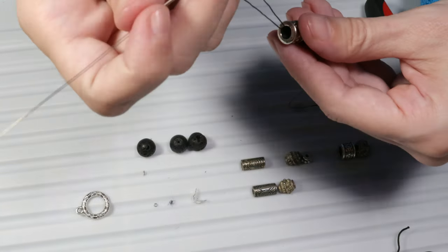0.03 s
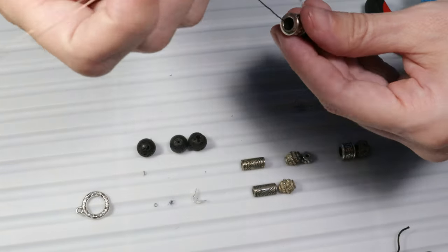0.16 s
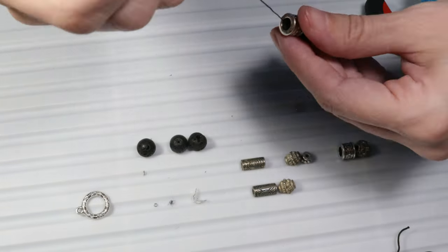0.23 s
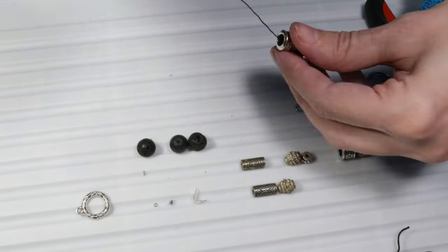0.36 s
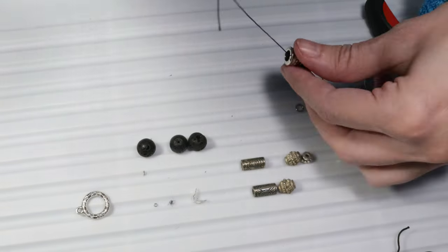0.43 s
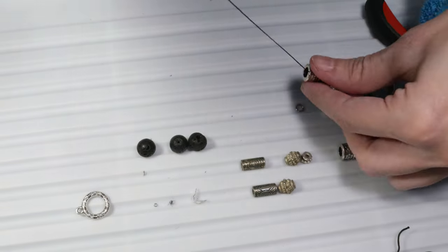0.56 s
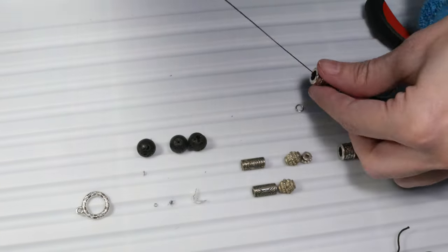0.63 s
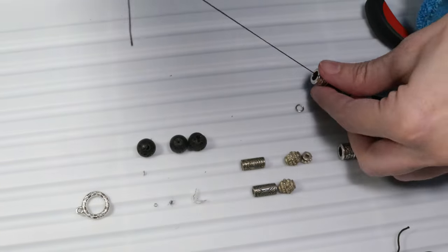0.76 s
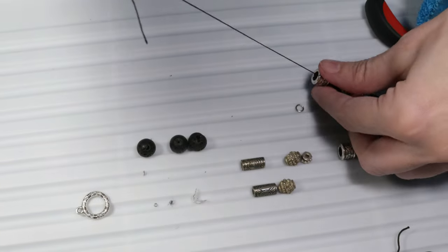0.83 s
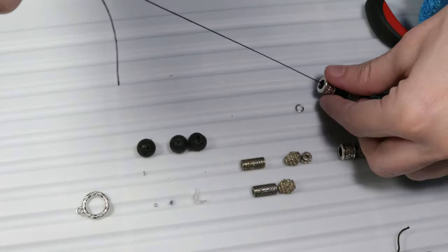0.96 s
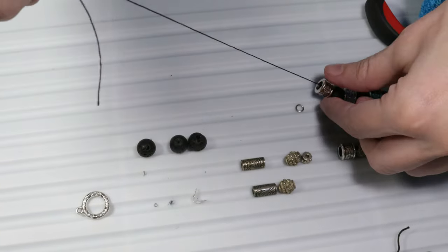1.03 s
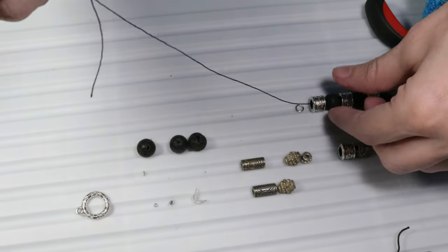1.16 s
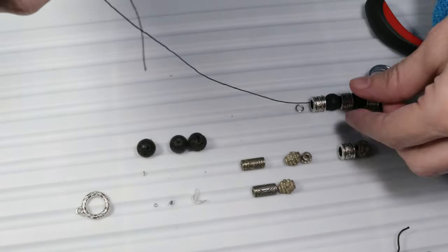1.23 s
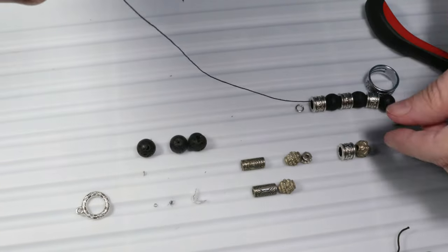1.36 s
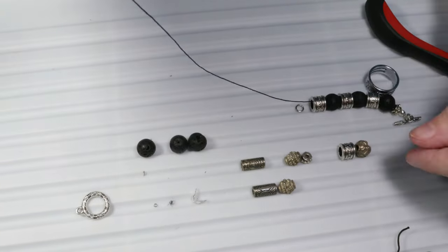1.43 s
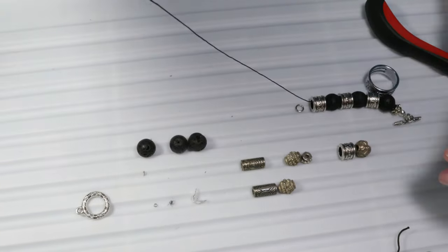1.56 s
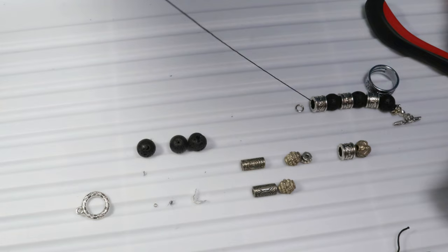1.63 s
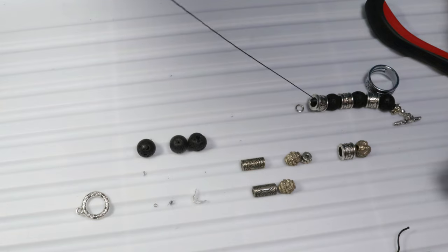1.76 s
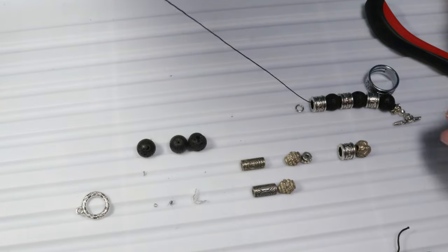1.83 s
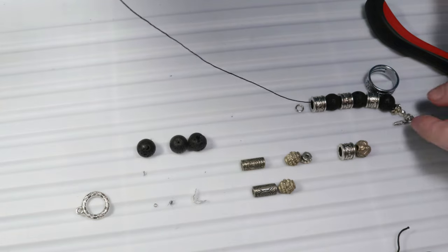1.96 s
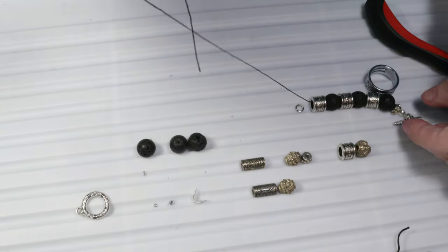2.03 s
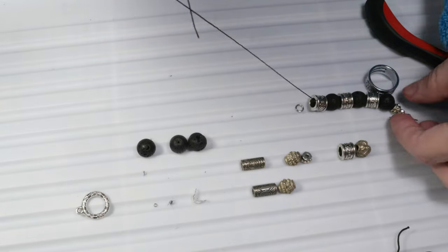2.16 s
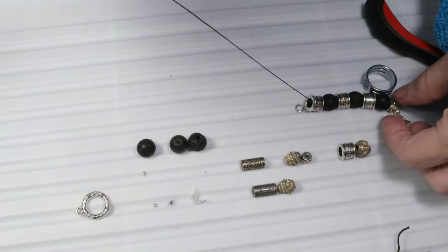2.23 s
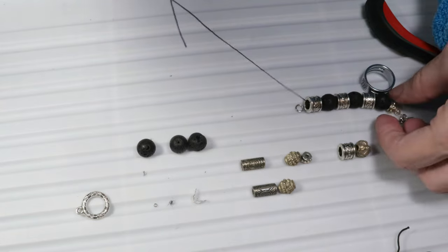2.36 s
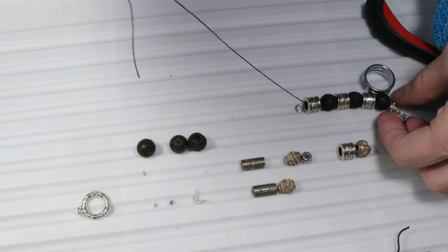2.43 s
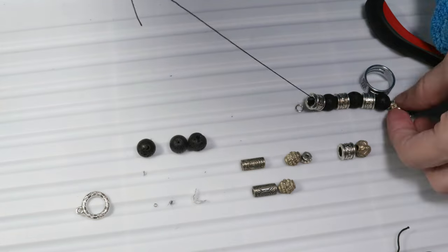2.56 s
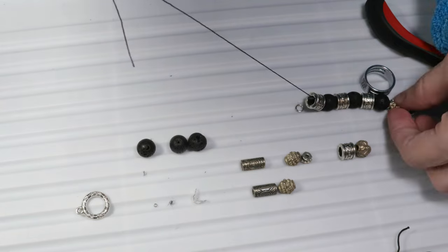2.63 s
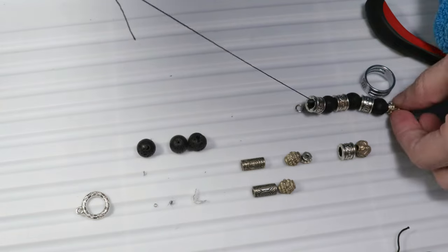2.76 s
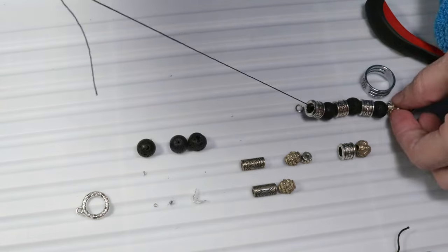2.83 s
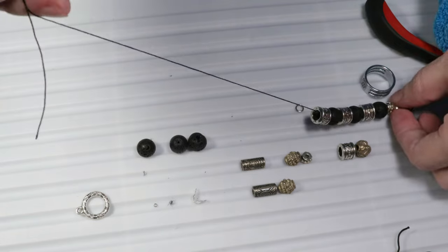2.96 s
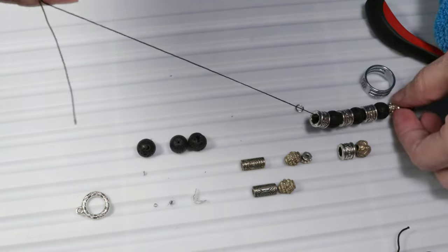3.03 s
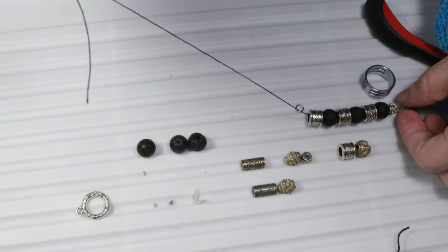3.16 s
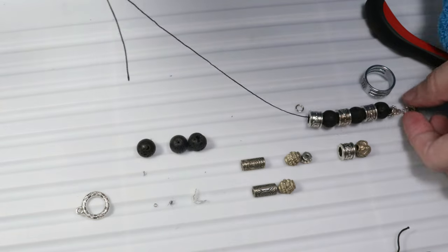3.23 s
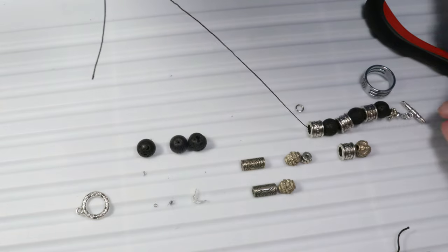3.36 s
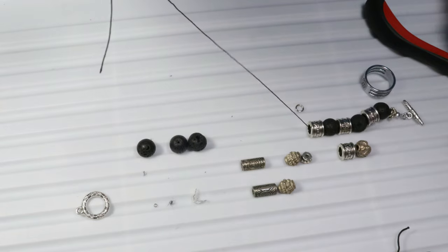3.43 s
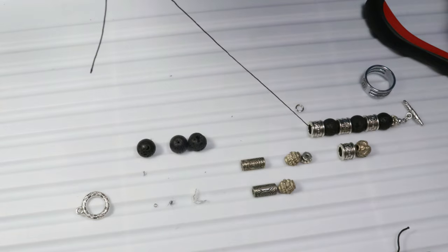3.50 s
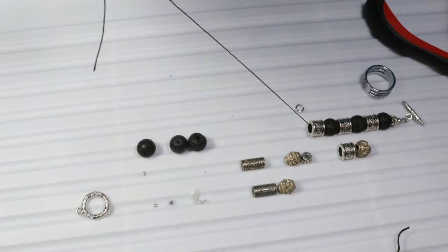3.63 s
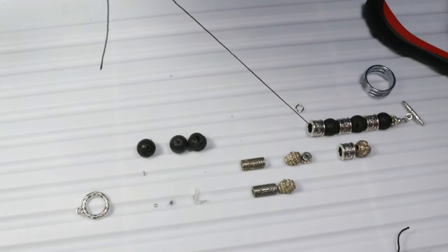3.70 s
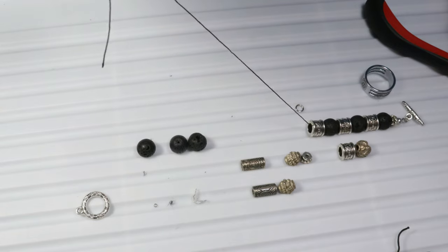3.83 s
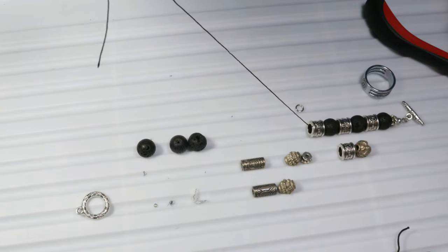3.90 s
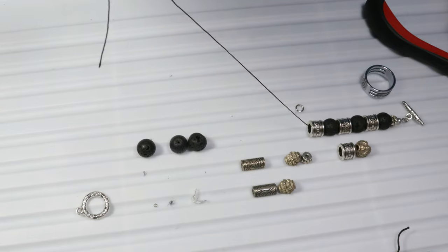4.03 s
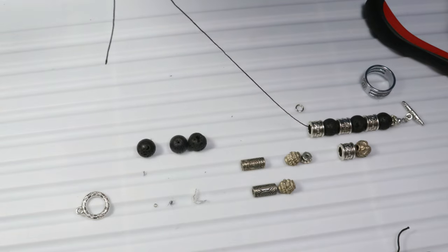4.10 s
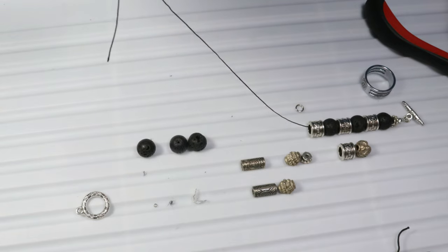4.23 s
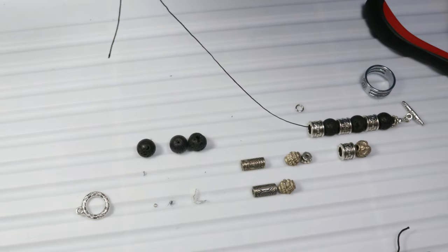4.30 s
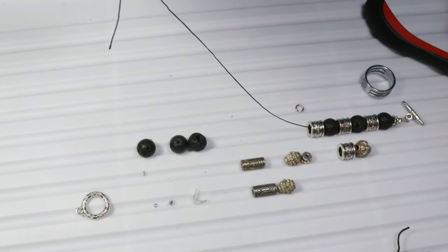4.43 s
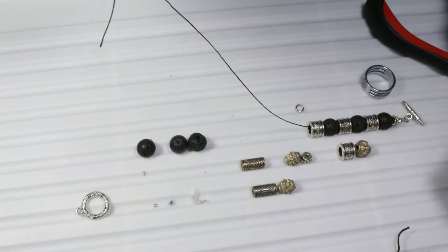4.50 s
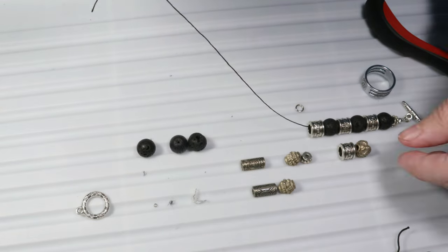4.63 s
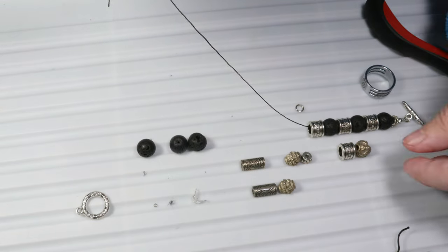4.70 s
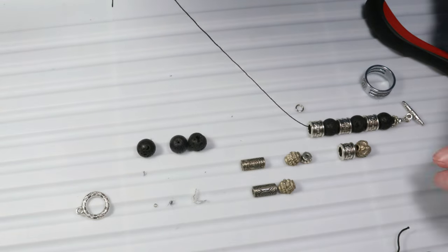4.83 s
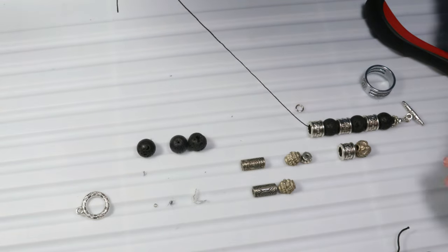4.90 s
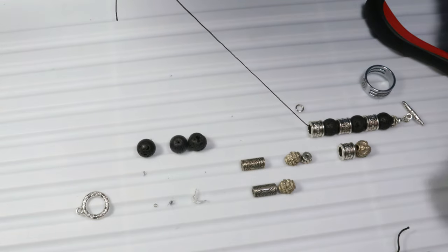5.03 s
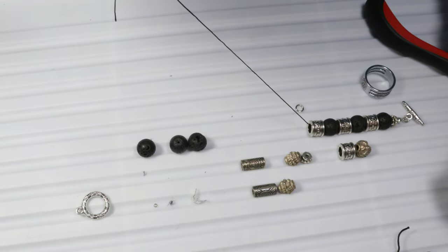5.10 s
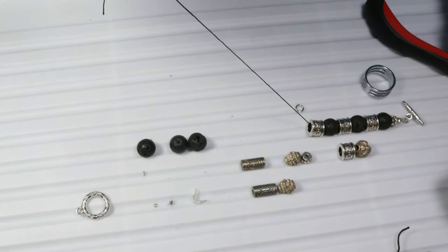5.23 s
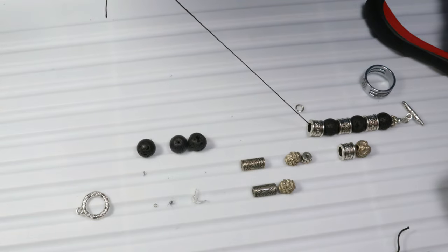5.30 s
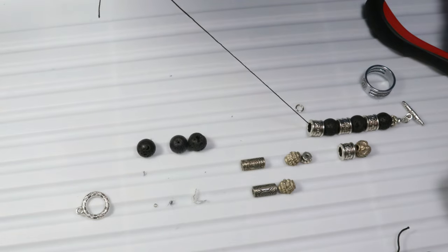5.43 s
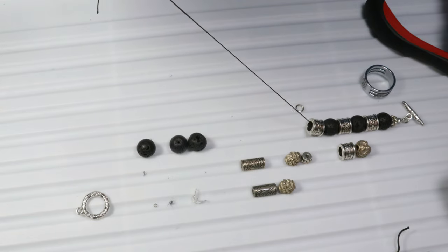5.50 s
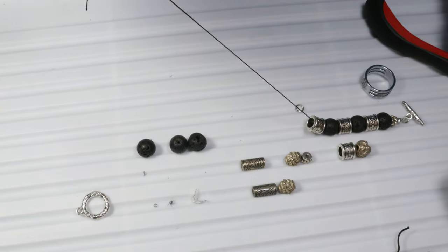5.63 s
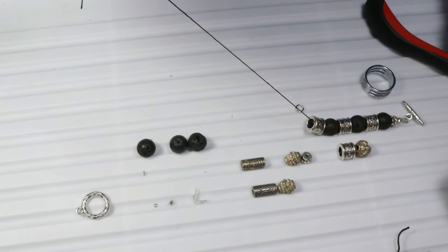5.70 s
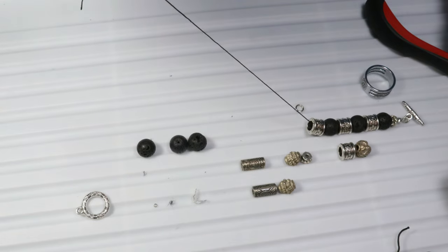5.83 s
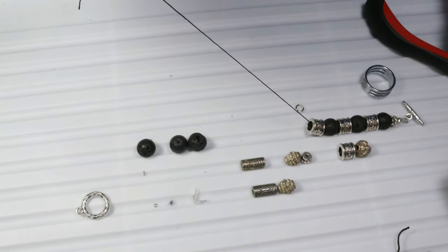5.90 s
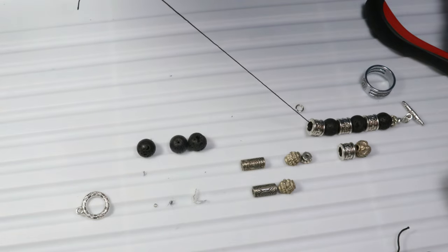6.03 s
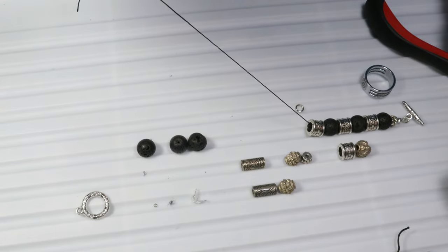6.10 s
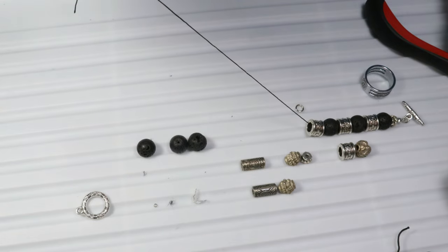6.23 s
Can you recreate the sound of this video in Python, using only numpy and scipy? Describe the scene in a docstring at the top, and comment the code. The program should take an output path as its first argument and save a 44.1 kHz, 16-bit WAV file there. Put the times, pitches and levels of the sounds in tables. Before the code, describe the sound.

Beads tap, rattle and drag across a hard, ridged tabletop tray, heard close up in a small room with very short reflections. Dry mid-pitched clacks come in uneven bursts, joined by soft fingertip thumps, faint stuttering scrapes and a barely audible thin metallic ping. The busy handling stops after under four seconds, leaving sparse faint clicks in a steady low hiss with slight hum.

```python
"""Small room, table, ribbed plastic tray: a strand of metal and stone beads is threaded, dragged, dropped.
Knocks ring short modes of tray, table and beads; drags are dense patters of small blows into the same modes.
Soft finger thumps ring only the low modes; a tube bead pings thin and high.
Decaying noise tails make the room; steady coloured noise makes the hush, narrow noise bands its faint hum.
A two-port microphone sets the stereo image from slopes of the direct sound."""
import sys
import numpy as np
from scipy import signal
from scipy.fft import rfft, irfft
from scipy.io import wavfile
from scipy.ndimage import uniform_filter1d

SR = 44100
rng = np.random.default_rng(int(sys.argv[2]) if len(sys.argv) > 2 else 0)


def dump(signal):
    """Clip the signal to [-1, 1] and save it as 16-bit WAV at the path in sys.argv[1]."""
    limited = np.clip(np.atleast_2d(signal).T, -1, 1)
    pcm = np.round(limited * 32767).astype(np.int16)
    wavfile.write(sys.argv[1], SR, pcm)


N = 276088
RING_N = 4096  # samples per blow


def undb(db):
    """dB to gain."""
    return 10 ** (np.asarray(db) / 20)


def level(x, db):
    """Set the rms."""
    return x * undb(db) / np.sqrt(np.mean(x ** 2))


def coloured(points):
    """White noise shaped in frequency, interpolated in dB over log frequency."""
    hz, db = np.transpose(points)
    f = np.fft.rfftfreq(N, 1 / SR)
    gain = undb(np.interp(np.log(f + 1), np.log(hz), db))
    return irfft(rfft(rng.standard_normal(N)) * gain, N)


# background spectra, mid and side: (frequency [Hz], relative density [dB])
HUSH_MID_SPECTRUM = [(15, -42), (25, -9.5), (198, -6.5), (221, -6.5), (410, -7), (445, -1.5), (509, -13),
                     (598, -11.5), (970, -15), (1140, -15), (1570, -23), (2060, -22.5), (9810, -42),
                     (13200, -47.5), (15500, -71)]
HUSH_SIDE_SPECTRUM = [(15, -54), (25, -24), (160, -8.5), (227, -5.5), (260, -7), (349, -6), (421, -6.5),
                      (1200, -10.5), (4750, -21.5), (10900, -33), (15500, -36)]
# wavering hum: (centre [Hz], width [Hz], rms level [dB])
HUM_BANDS = [(232.9, 6.2, -59.5), (460, 51, -58)]
HUSH_MID_RMS_DB, HUSH_SIDE_RMS_DB = -49, -50


def hush():
    """Steady coloured noise, mid and side; narrow noise bands waver as hum in the middle."""
    mid = level(coloured(HUSH_MID_SPECTRUM), HUSH_MID_RMS_DB)
    for hz, width_hz, db in HUM_BANDS:
        edges_hz = [hz - width_hz / 2, hz + width_hz / 2]
        band = signal.butter(1, edges_hz, "bandpass", fs=SR, output="sos")
        mid = mid + level(signal.sosfilt(band, rng.standard_normal(N)), db)
    side = level(coloured(HUSH_SIDE_SPECTRUM), HUSH_SIDE_RMS_DB)
    return np.array([mid, side])


# room tail: (band centre [Hz], t60 [s], mid gain [dB], side gain [dB])
ROOM_BANDS = [(242, 0.2, -2, -24), (498, 0.11, -9.5, -44), (1250, 0.14, -6.5, -34),
              (1900, 0.25, -18.5, -36), (3050, 0.16, -7, -18), (4800, 0.2, -10, -11), (9600, 0.084, -7, 0)]
FIRST_ECHO_S, ECHO_RISE_S = 0.004, 0.0007  # the walls answer after a gap


def room(x):
    """Echoes as decaying noise tails, band by band, mid and side; new tails on each call."""
    t = np.arange(SR // 3) / SR
    tails = np.zeros((2, len(t)))
    for hz, t60_s, mid_db, side_db in ROOM_BANDS:
        edges_hz = [hz / 1.4, min(hz * 1.4, 20000)]
        band = signal.butter(2, edges_hz, "bandpass", fs=SR, output="sos")
        noise = signal.sosfilt(band, rng.standard_normal((2, len(t))))
        onset = np.clip((t - FIRST_ECHO_S) / ECHO_RISE_S, 0, 1)
        shape = np.exp(-np.log(1000) * t / t60_s) * onset
        shape /= np.sqrt(np.sum(shape ** 2))
        tails += noise * shape * undb([[mid_db], [side_db]])
    return signal.fftconvolve(x[None], tails, axes=1)[:, :N]


# modes of table, tray and beads: (nominal frequency [Hz], level within its part [dB], t60 [s])
MODES = [(205.3, 7.5, 0.073), (226, 4.5, 0.11), (316, 9.5, 0.08), (403, -7, 0.021), (485, -19, 0.089),
         (626, 9.5, 0.034), (729, 0, 0.06), (911, 2.5, 0.013), (1071, 7.5, 0.021), (1269, -1, 0.07),
         (1820, -9.5, 0.0052), (1963, 11.5, 0.025), (2195, 2, 0.02), (2510, -0.5, 0.037), (3313, -6, 0.012),
         (3403, 4.5, 0.011), (4410, 4, 0.0081), (5100, 1, 0.0075), (6260, 11.5, 0.0018),
         (7340, 4.5, 0.0017), (9170, -8, 0.0098), (10300, 2, 0.0049), (11010, -5, 0.0055)]
# bounds of thud, body, knock, clack, edge, tick: frequency [Hz]
PART_BOUNDS_HZ = [0, 440, 850, 1500, 2950, 6700, 20000]


def part(k):
    """Modes between two bounds, sounding as one part."""
    return [mode for mode in MODES if PART_BOUNDS_HZ[k] < mode[0] <= PART_BOUNDS_HZ[k + 1]]


SCATTER_DB, DETUNE = 2.5, 0.012  # spread of mode level and of relative pitch from blow to blow
MIN_T60_S = 0.002


def ring(modes, chance, contact_s):
    """One blow on decaying sine modes, peak 1; chance shifts their strength and pitch."""
    t = np.arange(RING_N) / SR
    hz, db, t60_s = np.transpose(modes)[:, :, None]
    chance = chance[:len(modes)]
    gain = undb(db + SCATTER_DB * chance[:, :1])
    phase = 2 * np.pi * hz * (1 + DETUNE * chance[:, 1:]) * t
    decay = np.exp(-np.log(1000) * t / np.maximum(t60_s, MIN_T60_S))
    y = np.sum(gain * decay * np.sin(phase), axis=0)
    y *= 1 - np.exp(-(t / contact_s) ** 2)
    return y / np.abs(y).max()


# how long the push on each part lasts, thud to tick: duration [s]
PUSH_S = [0.0036, 0.0004, 0.00024, 0.00023, 0.00018, 0.00016]


def strike(k, modes, chance):
    """Ring modes of part k with its own contact time; a longer push softens the onset."""
    return ring(modes, chance, PUSH_S[k])


# fingers landing softly on the table: (time [s], thud level [dB])
FINGER_THUMPS = [(0.8016, -35), (1.0066, -35.5), (2.191, -32), (2.5563, -29.5), (3.6246, -35)]
THUMP_BODY_DB = -3  # re thud


def thumps():
    """A fingertip sounds only the two lowest parts."""
    out = np.zeros(N + RING_N)
    for s, thud_db in FINGER_THUMPS:
        i = int(s * SR)
        chance = rng.standard_normal((2, 8, 2))
        for k, rel_db in enumerate((0, THUMP_BODY_DB)):
            out[i:i + RING_N] += undb(thud_db + rel_db) * strike(k, part(k), chance[k])
    return out[:N]


# metal tube bead left free to ring: (time [s], peak level [dB])
TUBE_PINGS = [(.955, -60), (1.025, -52), (1.037, -52), (1.226, -55)]
TUBE_HZ, TUBE_T60_S, TUBE_CONTACT_S = 6560, 0.047, 0.0023


def tube():
    """A free tube rings one high mode: a thin ping."""
    out = np.zeros(N + RING_N)
    for s, db in TUBE_PINGS:
        i = int(s * SR)
        ping = ring([(TUBE_HZ, 0, TUBE_T60_S)], np.zeros((1, 2)), TUBE_CONTACT_S)
        out[i:i + RING_N] += undb(db) * ping
    return out[:N]


# strand and fingers over the tray; "fullest" outside the stroke leaves only a swell or a fade:
# (start [s], fullest [s], end [s], level [dB], weight [dB], brightness [dB])
STROKES = [(0.556, 0.776, 0.89, -52.5, -3, 18), (0.783, 0.78, 0.93, -49, -4, 4),
           (0.925, 1.083, 1.394, -47, -0.5, 9), (2.19, 2.26, 2.3, -45, -6, 8),
           (2.275, 2.312, 2.37, -40.5, -6.5, -3), (2.347, 2.368, 2.474, -49, 3.5, -6),
           (2.555, 2.562, 2.74, -38, -14, 19), (2.75, 2.762, 2.81, -58, 3, -1),
           (2.897, 3.04, 3.08, -52.5, -0.5, 3), (3.112, 3.1, 3.3, -62.5, 12.5, -16),
           (3.344, 3.386, 3.46, -50, -13, 3), (3.68, 3.798, 7.4, -58, -14, -6),
           (1.927, 1.97, 1.945, -56, 8, 5)]
# parts, thud to tick: (level re stroke [dB], share of weight [ratio], share of brightness [ratio])
STROKE_MIX = [(4, 0.61, 0.051), (7, 0.86, 0.15), (1, 1, 0.26), (2, 0.69, 0), (-12.5, 0.2, 0.019),
              (-47, 1.2, 0.46)]
STREAMS, GRAINS_PER_S = 8, 1100  # rate over all streams
GRAIN_DB, GRAIN_TOP = 6, 2.2  # spread; largest grain in spreads
STROKE_FADE_DB, SWELL_SMOOTH_SAMPLES = -14.5, 300  # fade at either end of a stroke
DRAG_WANDER = 0.05  # relative pitch spread: the strand crosses many spots
DRAG_DAMPING = 0.93  # fingers shorten every ring (t60 ratio)


def grain_stream():
    """Sparse random impulses of random size and sign."""
    hits = rng.random(N) < GRAINS_PER_S / SR / STREAMS
    size = undb(GRAIN_DB * np.minimum(rng.standard_normal(N), GRAIN_TOP))
    return hits * size * rng.choice([-1, 1], N)


def stroke_swell(start_s, full_s, end_s, db):
    """Gain over one stroke, moving in dB."""
    t = np.arange(N) / SR
    times_s = [start_s, full_s, end_s]
    shape_db = np.interp(t, times_s, [STROKE_FADE_DB, 0, STROKE_FADE_DB])
    return ((t > start_s) & (t < end_s)) * undb(db + shape_db)


def drag():
    """Beads and fingers stutter over the ribs: a dense patter of small blows, gated by the strokes."""
    streams = [grain_stream() for _ in range(STREAMS)]
    swells = [stroke_swell(*stroke[:4]) for stroke in STROKES]
    out = np.zeros(N)
    for k, (db, heavy, hard) in enumerate(STROKE_MIX):
        modes = np.array(part(k)) * [1, 1, DRAG_DAMPING]
        patter = np.zeros(N)
        for grains in streams:
            pitch = 1 + DRAG_WANDER * rng.standard_normal()
            blow = strike(k, modes * [pitch, 1, 1], rng.standard_normal((8, 2)))
            patter += signal.fftconvolve(grains, blow)[:N]
        gain = np.zeros(N)
        for swell, stroke in zip(swells, STROKES):
            gain += swell * undb(heavy * stroke[4] + hard * stroke[5])
        out += uniform_filter1d(gain, size=SWELL_SMOOTH_SAMPLES) * level(patter, db)
    return out


# beads striking the tray, levels before settling: (time [s], clack [dB], body [dB], knock [dB],
# edge [dB], tick [dB], clack pitch [Hz])
BEAD_KNOCKS = [(0.5736, -20, -29, -23.5, -33, -33, 2040), (0.6041, -33, -36, -51, -60, -52, 1970),
               (0.6621, -37.5, -41, -51, -59, -67.0, 2050), (0.7153, -34, -54, -54, -62, -56.0, 2040),
               (0.7617, -35, -42, -48, -50.5, -64.0, 1970), (0.7865, -25, -55, -32, -37, -25, 2030),
               (0.7944, -29.5, -27, -30, -31.5, -30, 2140), (0.8011, -32, -41, -48, -41, -27.5, 2140),
               (0.8036, -38, -37, -39, -42, -39, 2000), (0.815, -40, -28.5, -55.0, -53, -55, 2050),
               (0.9453, -38.5, -37, -60, -43.5, -53, 2200), (1.0226, -33.5, -28.5, -30.5, -44, -64, 1990),
               (1.047, -52, -29, -48, -47, -59.0, 1720), (1.074, -32, -31, -26, -43, -53, 1930),
               (1.1106, -25, -36, -22.5, -30.5, -39, 1990), (1.1225, -31, -22, -31, -48, -54.0, 1830),
               (1.1425, -25.5, -51, -41, -52, -61.0, 2060.0), (1.1686, -35, -47, -25, -46, -41, 1840),
               (1.1859, -11, -14, -13, -22.5, -33, 1870), (1.2001, -14, -20, -12.5, -26, -38, 1830),
               (1.2095, -21, -45.5, -22, -44, -54, 1740.0), (1.254, -9, -20.5, -29, -23, -40.0, 1920),
               (1.2572, -23, -13, -7, -20.5, -36, 1820), (1.2692, -15, -31, -22, -22, -42, 1920),
               (1.2722, -17, -21, -9, -24, -34, 1890), (1.2708, -7, -13.5, -10, -25, -31, 1894),
               (1.2745, -11, -20.5, -11, -20, -39.0, 1870), (1.2872, -18.5, -45, -18, -42, -48, 1980),
               (1.3076, -23, -52.5, -40, -47, -60.5, 1810), (1.731, -34.5, -37.5, -47, -48, -52, 2100),
               (1.7415, -51, -57, -44, -56, -66.0, 2130), (1.826, -32.5, -55, -56, -56.0, -68.0, 2320),
               (1.8314, -27.5, -34, -29, -54, -48, 2050), (1.9085, -26.5, -38, -28, -52, -62.0, 1850),
               (1.9301, -24, -37, -20, -46, -58.0, 1750), (1.9345, -23, -29, -37, -52, -62, 2000),
               (1.9528, -16.5, -26.5, -22, -36, -56, 1760), (1.9639, -14.5, -30.5, -15, -31, -41.5, 1820),
               (1.9715, -29.5, -39, -48, -54.5, -59.5, 1950), (2.2155, -39, -58, -51.5, -56.5, -64.0, 2090),
               (2.2341, -26.5, -51, -31.5, -35, -54.0, 2250), (2.2418, -27, -48, -32, -39, -58, 2170),
               (2.2547, -33, -37, -29, -53, -62, 1940), (2.2788, -31, -35, -29, -44, -54, 2120),
               (2.2864, -46, -57.0, -29.5, -53.0, -62.5, 1800.0), (2.2935, -31.5, -51, -48, -48, -60, 2010),
               (2.3023, -43, -42, -30, -42, -56, 1830.0), (2.318, -38, -39, -25, -51, -58, 1860),
               (2.3274, -36, -29.5, -50, -54, -63.5, 1870), (2.342, -46, -53, -50, -47, -64.0, 1870),
               (2.349, -40, -47, -39, -64.5, -67.5, 1750), (2.3785, -22.5, -42, -29, -33.5, -57, 2050),
               (2.3996, -37, -27.5, -32, -53, -61.0, 1870), (2.4628, -21.5, -27.5, -17.5, -40, -54, 1900),
               (2.4982, -14.5, -35, -16, -34, -49, 1810), (2.529, -47, -53, -49, -55.5, -67.5, 1830.0),
               (2.5651, -40, -37.0, -58.5, -32, -46, 2030), (2.5764, -29, -35, -44, -43, -47, 2030),
               (2.5817, -26.5, -44, -33.5, -26.5, -47, 2370), (2.6105, -29, -43, -30, -37, -48, 2370),
               (2.6255, -28.5, -33, -29, -36, -39, 1900), (2.642, -52, -56.0, -50, -51, -56.0, 2000),
               (2.6602, -31.5, -29.5, -29, -58, -60.5, 2190), (2.7403, -45, -36.5, -56, -64.5, -69, 2100),
               (2.7726, -41, -35, -40, -51.0, -66.0, 1770.0), (2.7972, -39, -37, -32, -54.0, -65.5, 2020),
               (2.8567, -40.5, -37, -42, -56, -68.5, 2100), (2.9178, -24, -31, -29.5, -47, -64, 2000),
               (2.9697, -31, -36, -38, -58.5, -62.5, 1930), (2.9983, -31, -33, -57.0, -46, -51, 2080),
               (3.0195, -29.5, -41, -33, -42, -59, 2050), (3.0403, -45, -46.5, -39, -45, -58, 1820),
               (3.057, -27.5, -50, -56, -47, -58.5, 1990), (3.1107, -31, -33, -30, -52, -62.0, 1890),
               (3.1354, -37, -43, -47, -52, -50, 2110), (3.2266, -18.5, -45, -21, -37, -44, 2070),
               (3.2305, -15, -26, -14.5, -27, -40, 1840), (3.2508, -19, -29, -14, -28.5, -35, 2140),
               (3.2556, -24, -29, -19.5, -46, -53, 1760), (3.262, -18, -46.5, -22, -51, -52, 1900),
               (3.2789, -15, -31.5, -16, -31.5, -49, 1850), (3.2825, -27, -44, -29, -53.5, -63.5, 1790.0),
               (3.4131, -33.5, -39, -57.5, -51, -50, 2100), (3.4504, -7, -22, -10, -17.5, -27.5, 1990),
               (3.4542, -10, -13, -15, -23.5, -41, 1790), (3.4614, -8.5, -17, -12, -23.5, -38, 1870),
               (3.4758, -20, -50, -23, -43, -40, 1870), (3.4824, -16, -46, -40, -36, -40.0, 1990),
               (3.4994, -15, -21.5, -13, -31, -45, 2130), (3.5174, -30.5, -51, -41, -32, -49, 1833),
               (3.5532, -16.5, -27, -20, -41, -62, 2000), (3.5707, -13, -20, -15, -23, -40, 2130),
               (3.578, -18, -35, -21, -45, -54, 1900), (3.594, -33, -28, -27, -47.5, -58, 1930),
               (3.6235, -14, -20, -42, -33, -42, 1980), (3.6292, -7, -8.5, -8.5, -15, -26, 1920),
               (3.6401, -14, -29, -18, -24, -39, 1880), (3.6545, -22.0, -43, -24.5, -33, -42, 2020),
               (4.0128, -43, -39, -48, -57, -67.5, 2040), (4.1058, -25, -42, -26.5, -41, -60, 1960),
               (4.1839, -28.5, -34, -32, -44, -64.5, 1960), (4.193, -37, -49, -51, -44, -62, 2400),
               (4.332, -48, -56, -42, -42, -53, 2180), (5.1771, -43.5, -41, -54, -53, -60.0, 2020),
               (5.237, -47, -55, -40, -63.5, -63.0, 1810.0), (5.442, -41, -45, -37, -58, -64.5, 1860),
               (5.675, -46, -39, -53, -56, -59, 1960), (5.908, -49, -40, -42, -58, -66, 1950)]
# change of each part as the bead settles, thud to tick: gain [dB]
SETTLE_GAIN_DB = [-0.5, -1.5, -6.5, -9, 6, 8]
AIRBORNE_S, SETTLE_S = 0.0043, 0.00058  # the bead bounces clear, then settles
TRAVEL_S = 0.0004  # tray to microphone
THUD_DB = -18  # table under the tray, re body
CLACK_HZ, CLACK_SPAN_HZ = 1950, 400  # modes this near the clack move with the spot struck
PLACES = 4  # spots on the tray, each with its own echo pattern


def move_clack(modes, clack_hz):
    """Scale the modes near the clack to the pitch of the spot struck."""
    moved = []
    for hz, db, t60_s in modes:
        near = abs(hz - CLACK_HZ) < CLACK_SPAN_HZ
        moved.append((hz * clack_hz / CLACK_HZ if near else hz, db, t60_s))
    return moved


def knocks():
    """Every blow rings all parts, each as struck; their levels shift as the bead settles on the tray."""
    out = np.zeros((PLACES, N + 8192))
    t = np.arange(RING_N) / SR
    settled = 1 / (1 + np.exp(np.clip((AIRBORNE_S - t) / SETTLE_S, -50, 50)))
    for row, (s, clack, body, knock, edge, tick, clack_hz) in enumerate(BEAD_KNOCKS):
        chance = rng.standard_normal((6, 8, 2))
        i = int((s + TRAVEL_S) * SR)
        for k, db in enumerate((body + THUD_DB, body, knock, clack, edge, tick)):
            blow = strike(k, move_clack(part(k), clack_hz), chance[k])
            out[row % PLACES, i:i + RING_N] += undb(db + SETTLE_GAIN_DB[k] * settled) * blow
    return out[:, :N]


PORT_LAG_SAMPLES = 0.68  # right port nearer: right leads and left lags by this
RIGHT_LEAN = 0.38  # treble louder right, softer left (samples squared)


def scene():
    """Beads in front of the microphone, room and hush around; mid and side decoded to left and right."""
    places = list(knocks()) + [tube() + drag() + thumps()]
    beads = sum(places)
    mid, side = sum(room(x) for x in places) + hush()
    # two close ports: their difference is the slope of the direct sound
    slope = np.gradient(beads)
    side = side - PORT_LAG_SAMPLES * slope + RIGHT_LEAN * np.gradient(slope)
    return np.array([beads + mid + side, beads + mid - side])


TREBLE_HZ, BASS_HZ, TOP_HZ = 12000, 12, 15600


def record(dry):
    """The small microphone rolls off treble and lowest bass; the recorder cuts the top steeply."""
    treble = signal.butter(2, TREBLE_HZ, fs=SR, output="sos")
    bass = signal.butter(1, BASS_HZ, "highpass", fs=SR, output="sos")
    heard = signal.sosfilt(np.vstack([treble, bass]), dry)
    top_cut = signal.ellip(10, 0.2, 80, TOP_HZ, fs=SR, output="sos")
    return signal.sosfilt(top_cut, heard)


dry = scene()
out = record(dry)
dump(out)
```